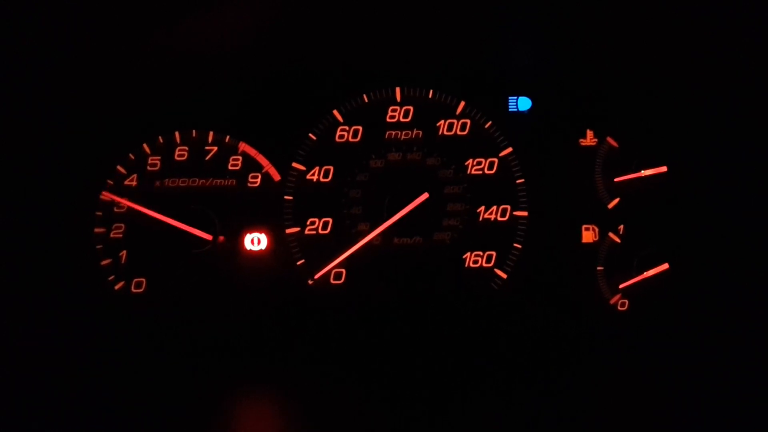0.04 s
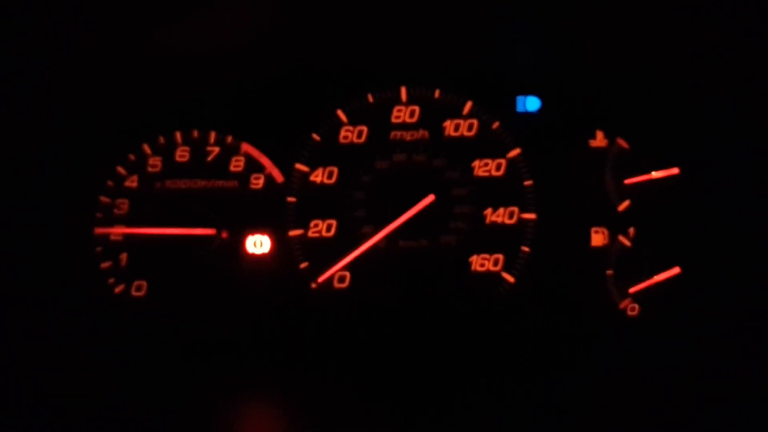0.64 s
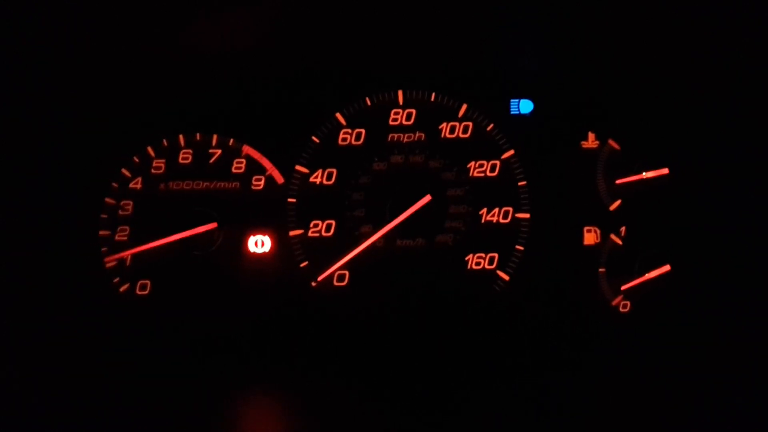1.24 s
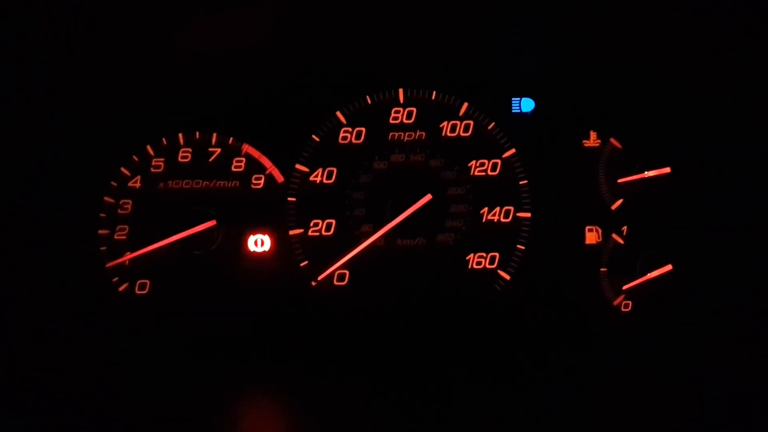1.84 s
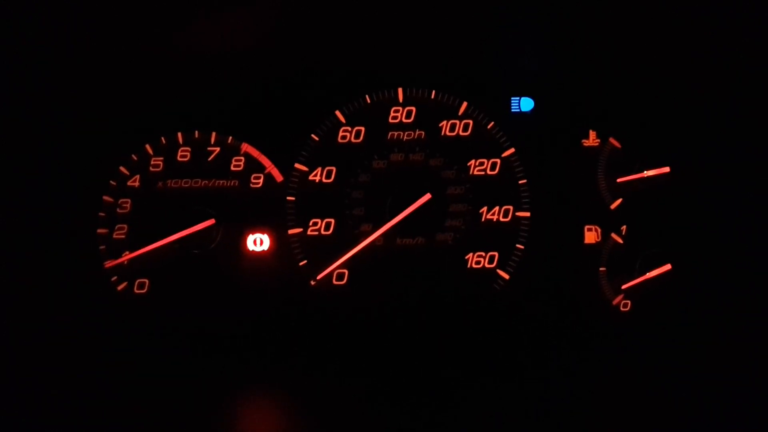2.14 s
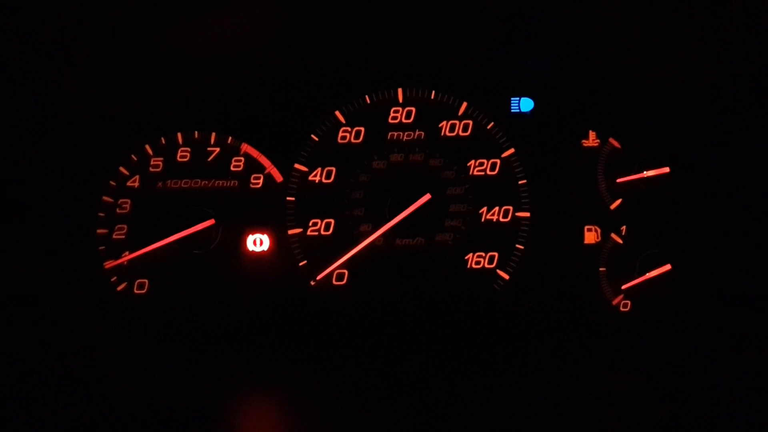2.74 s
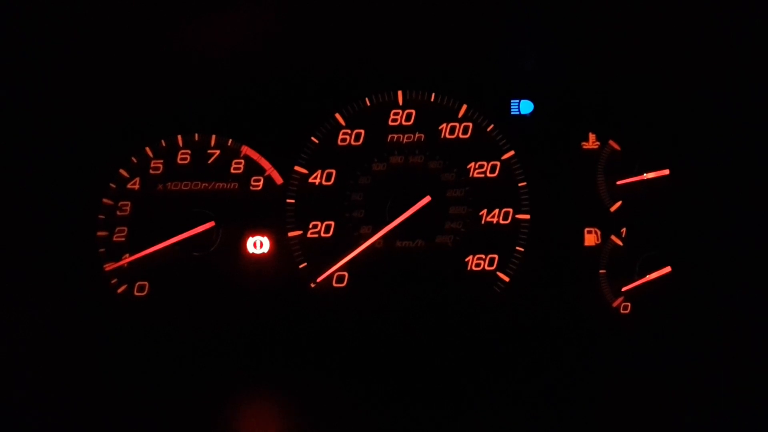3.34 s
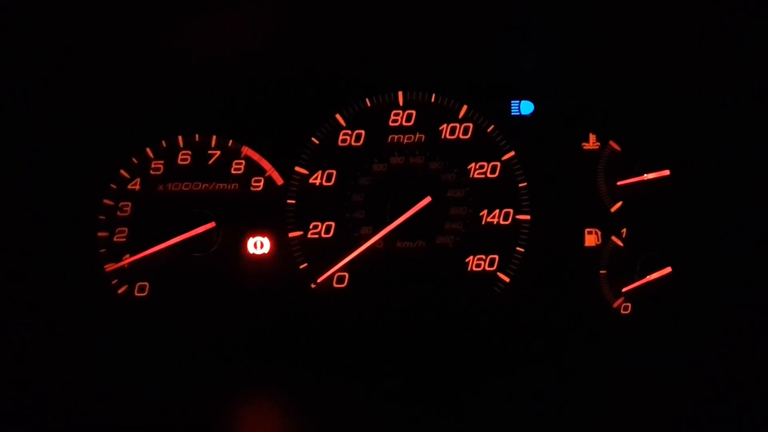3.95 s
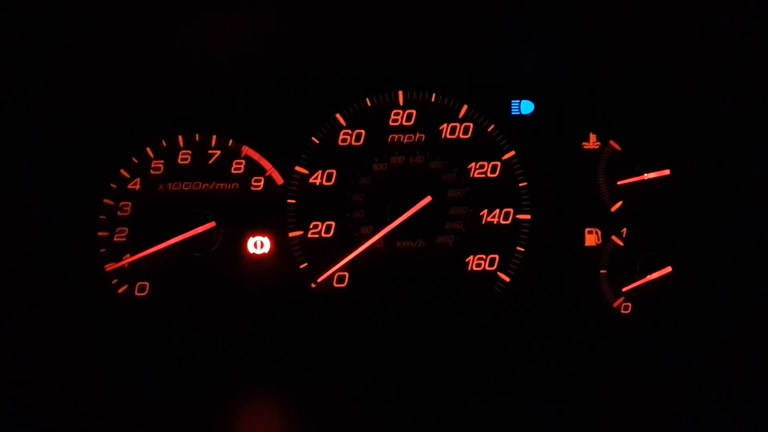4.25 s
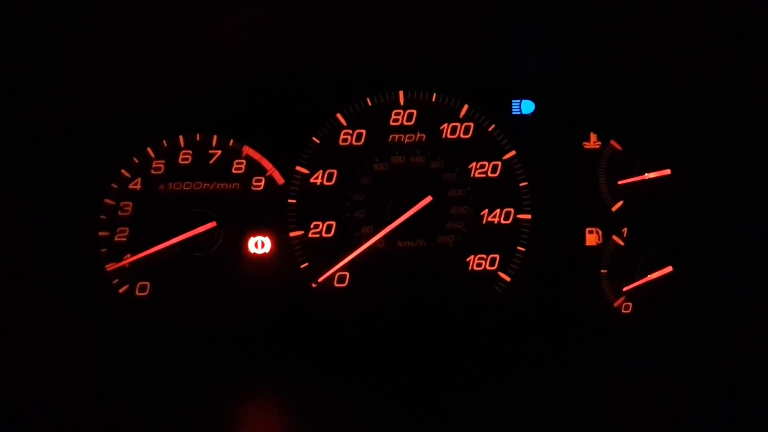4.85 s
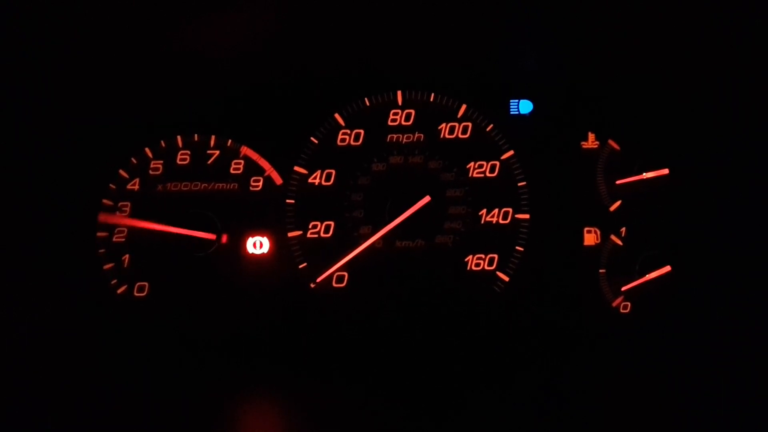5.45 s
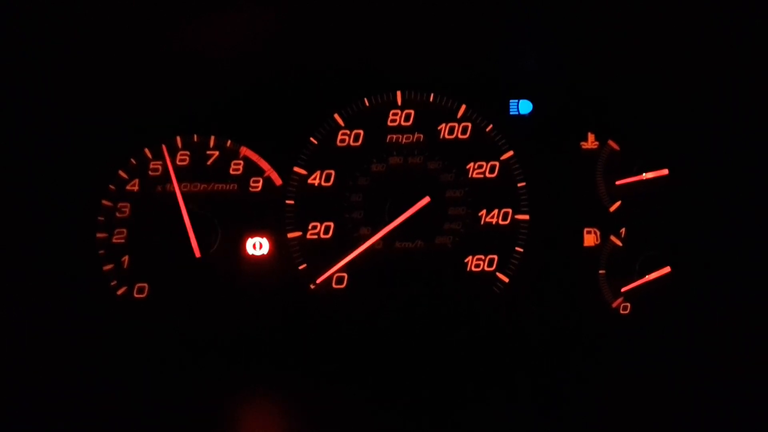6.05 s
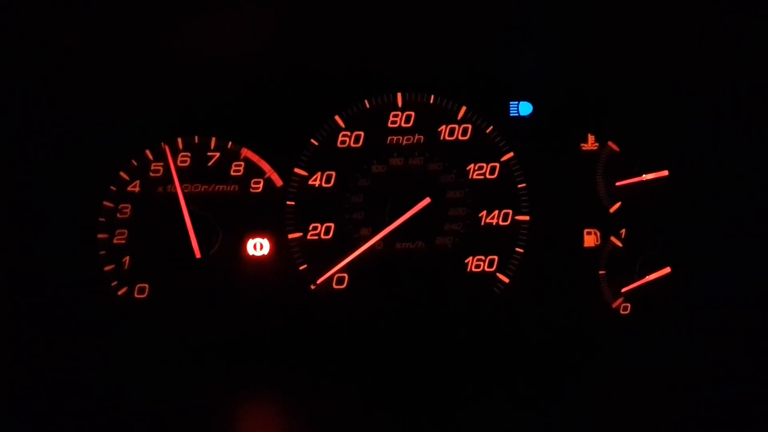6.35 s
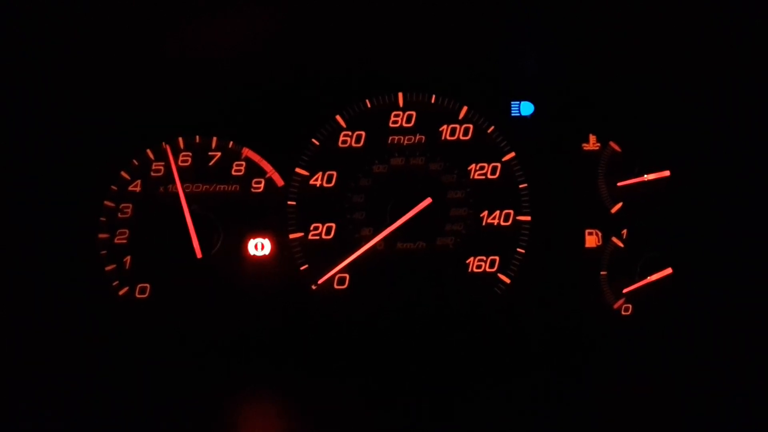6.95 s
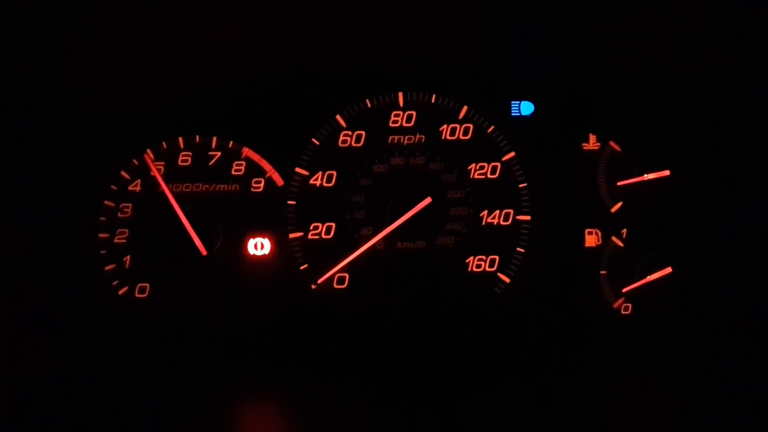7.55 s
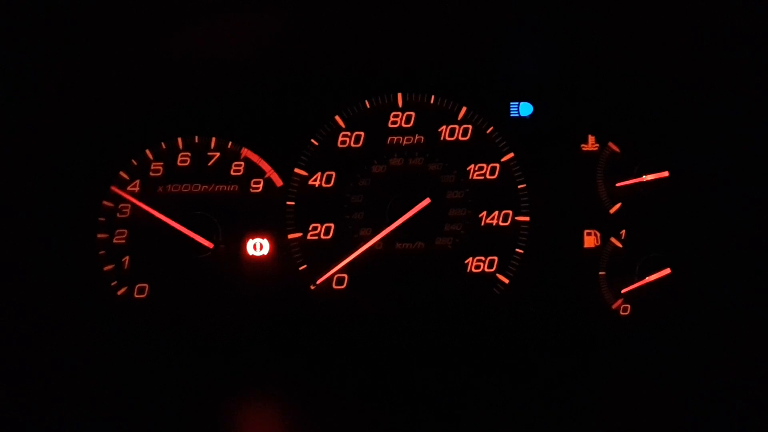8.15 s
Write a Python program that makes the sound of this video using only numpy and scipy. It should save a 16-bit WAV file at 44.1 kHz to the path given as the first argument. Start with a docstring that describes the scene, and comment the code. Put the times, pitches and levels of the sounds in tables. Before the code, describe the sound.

A four-cylinder car engine is heard from the driver's seat, deep and booming in the closed cabin. It starts at raised revs and falls in pitch and loudness, with three dull thuds in the first 0.6 seconds. By about 2 seconds it settles into a quiet, low idle hum with a faint hiss. Soft thumps come around 4.7 seconds, then a light pedal clack slightly to the left at 4.9 and another low thud. From 5.2 seconds the engine revs sharply, swelling into a loud roar with exhaust burble and muffled mechanical clatter. Between about 5.7 and 7.2 seconds it holds a high drone, bouncing softly off the rev limiter six times in an even pulse. Then the throttle is released and the engine winds down, still booming and falling in pitch at the end, around 8.2 seconds.

```python
"""A booming four-cylinder engine sinks to idle, heard from the driver's seat. The pedal clacks,
the engine races up, bounces six times off a soft rev limiter, then winds down.
The firing tone booms in the cabin's standing waves and exhaust tones sweep through its panels;
each firing puffs out roar, and clatter that comes muffled through the bulkhead."""
import sys
import numpy as np
from scipy import signal
from scipy.fft import rfft, irfft, next_fast_len
from scipy.io import wavfile
from scipy.ndimage import uniform_filter1d

SR = 44100
rng = np.random.default_rng(int(sys.argv[2]) if len(sys.argv) > 2 else 0)


def digitize_waveform(pressure):
    """Quantize a signal to 16-bit integers and store it at the path in sys.argv[1].

    Rows of a 2-D input are taken as channels; values are limited to [-1, 1].
    """
    field = np.atleast_2d(pressure).T
    bounded = np.clip(field, -1, 1)
    quanta = np.round(bounded * 32767).astype(np.int16)
    wavfile.write(sys.argv[1], SR, quanta)


N = 362061
TIME = np.arange(N) / SR
FFT_SIZE = next_fast_len(N + SR // 10, True)
BINS_HZ = np.fft.rfftfreq(FFT_SIZE, 1 / SR)


# engine speed: sinking to idle, pedal down, at each fuel cut, pedal up (time [s], firing rate [Hz])
RUN_DOWN = [(0, 102.4), (.1, 100), (.4, 79.83), (.6, 69.13), (.8, 54.15), (1, 43.93), (1.3, 31.3),
            (1.6, 29.6), (2.05, 26.4)]
RUN_UP = [(5.139, 26.4), (5.2, 31.92), (5.3, 47.02), (5.4, 70), (5.5, 108), (5.675, 171.8)]
FUEL_CUTS = [(5.755, 192.6), (6.014, 190.3), (6.284, 193.7), (6.564, 191.6), (6.847, 195.5), (7.127, 189.7)]
WIND_DOWN = [(7.3, 175.4), (7.5, 159.2), (7.8, 136.7), (8.21, 107.7)]

def firing_rate(resume_hz=174.8, surge_s=.066):
    """Engine speed in Hz; after a cut it sags until fuel returns and it surges to the next cut."""
    resumes = [(s - surge_s, resume_hz) for s, _ in FUEL_CUTS[1:]]
    points = sorted(tuple(row) for row in [*RUN_DOWN, *RUN_UP, *FUEL_CUTS, *resumes, *WIND_DOWN])
    return lookup(points, TIME)


# extra shake under full fuel (firing rate [Hz], gain [dB])
BOOM_PULL = [(50, -2.5), (75, 13), (120, 4), (175, -0.5)]
# cabin standing waves (frequency [Hz], width [Hz], gain [dB], polarity at the seat [+/-1])
AIR_MODES = [(50.46, 20.9, -24, 1.0), (53.66, 8.1, -19, -1.0), (65, 5.8, -27.5, -1.0),
             (91.5, 9.4, -22.7, 1.0), (103.1, 6.7, -19, -1.0), (113.9, 15, -13.5, 1.0),
             (123.73, 9.1, -12.5, 1.0), (132.27, 28.1, -6, -1.0), (133.7, 8, -5, 1.0),
             (146, 18.8, -13.5, 1.0), (161.5, 12, -9.5, -1.0), (162.96, 7.1, -5.5, 1.0),
             (173.5, 6.9, -9.5, 1.0), (186.4, 13.3, -6.5, -1.0)]

def boom(cycles, hz, fuel, flutter_db=.67, left_db=.5, lead_cycles=.026):
    """The firing tone sweeps the cabin's standing waves, which swell, ring on and beat against it."""
    idle_db = np.interp(hz, [26, 31], [-14, 0])
    drive_db = fuel * lookup(BOOM_PULL, hz) + idle_db + flutter_db * (1 + fuel) * wander(35)
    drive = amp(drive_db) * np.exp(2j * np.pi * cycles)
    air = np.zeros(N, complex)
    for mode_hz, width_hz, db, polarity in AIR_MODES:
        decay = np.exp(-np.pi * width_hz / SR)
        pole = decay * np.exp(2j * np.pi * mode_hz / SR)
        air += polarity * amp(db) * signal.lfilter([1 - decay], [1, -pole], drive)
    left = air * np.exp(2j * np.pi * lead_cycles)
    return np.sqrt(2) * np.array([left.real, air.real]) * pan(left_db / 2)


# octave through the cabin (frequency [Hz], level [dB])
OCTAVE_COLOUR = [(53, -49), (66, -51.5), (76, -38.5), (93, -36), (112, -40.5), (135, -39.5), (155, -44),
                 (175, -41.5), (190, -34.5), (205, -48), (220, -37), (245, -45), (350, -40.5), (385, -33)]
# change under full fuel (firing rate [Hz], gain [dB])
OCTAVE_PULL = [(58, 12), (80, -2), (105, 12), (138, -8), (164, 13.5), (178, -2)]

def octave(cycles, hz, fuel, left_db=2, lead_cycles=.021):
    """The firing tone's octave, stronger under fuel at most speeds."""
    level_db = log_lookup(OCTAVE_COLOUR, 2 * hz) + fuel * lookup(OCTAVE_PULL, hz) + .5 * wander(7)
    stereo_cycles = cycles + np.array([[lead_cycles], [0]])
    return tone(2 * stereo_cycles, level_db) * pan(left_db / 2)


def drone(cycles, hz, labour, modes_db=-38, labour_db=-38, panel_db=-34.5):
    """The third order rings two air modes and a panel on the left, and grows as the engine labours."""
    modes = sum(resonance(3 * hz, mode_hz, width_hz=30) for mode_hz in (120, 192))
    air = np.interp(hz, [28, 38], [0, 1]) * modes * amp(modes_db)
    panel = amp(panel_db) * resonance(3 * hz, 553, width_hz=45) * pan(3)
    return (air + labour * amp(labour_db) + panel) * tone(3 * cycles, 2 * wander(20))


# prominent exhaust tones (order [x firing rate], gain [dB])
STRONG_ORDERS = [(.75, 6.5), (1.5, -0.5), (3.5, 0), (3.75, 3.5), (4, 5), (4.5, 0), (5, 8), (5.75, 7),
                 (6, 2.5), (8, -0.5), (10.25, 4)]
# exhaust path into the cabin (frequency [Hz], gain [dB])
EXHAUST_COLOUR = [(20, -14.5), (60, -3), (110, 6), (230, 1), (330, -4.5), (450, -6), (620, 1), (780, -6.5),
                  (1100, -15), (1500, -24), (2200, -21.5)]

def exhaust(cycles, hz, waver=.38, half_order_db=2, gain_db=3):
    """Unequal cylinders give tones at quarters of the firing rate, which sweep through the panels."""
    strong_db = {round(4 * order): db for order, db in STRONG_ORDERS}
    lines = np.zeros(N, complex)
    for quarter in range(1, 36):
        if quarter not in (4, 8):  # played by boom and octave
            db = strong_db.get(quarter, 0) + half_order_db * (quarter % 2 == 0)
            size = amp(db) * (1 + waver * wander(18))
            lines += size * np.exp(2j * np.pi * (quarter * cycles / 4 + rng.random()))
    running = np.interp(hz, [28, 42], [.1, 1])
    return spread(np.array([lines.real, lines.imag]), cabin(EXHAUST_COLOUR)) * running * amp(gain_db)


# coasting tones (order [x firing rate], level re roar [dB])
COAST_ORDERS = [(1.5, -11), (2.5, -16), (3, -8.5), (3.75, -14), (4, -13)]

def overrun(cycles, coasting, roar_db):
    """With the fuel off, a few orders sing out as they fall."""
    lines = sum(tone(order * cycles + .031 * wander(20), roar_db + db + 3 * wander(7))
                for order, db in COAST_ORDERS)
    return coasting * lines * pan(-.5)


# noise spectra in the cabin (frequency [Hz], relative density [dB])
ROAR_COLOUR = [(20, -11), (60, 3), (110, 2.5), (230, 3.5), (300, -3.5), (450, -7), (620, -5), (780, -6.5),
               (1100, -13), (1400, -17.5), (2200, -50)]
CLATTER_COLOUR = [(500, -31), (1000, -10), (1400, 2.5), (1900, -2.5), (2400, 1.5), (2900, -2), (3800, -9.5),
                  (4900, -16.5), (6000, -24.5), (9000, -41)]
FIZZ_COLOUR = [(3500, -17), (5800, -10), (6600, -6), (7000, 0), (7400, -4.5), (8000, 0), (9400, -1.5),
               (10300, -0.5), (11500, -3), (13300, -7.5), (15500, -15.5)]

def firing_noise(cycles, hz, labour, roar_db, clatter_db, trim_hz=170.5, trim_width_hz=8.3, trim_db=-56):
    """Each firing puffs roar, clatter and fizz; loose trim fizzes as the rate passes its resonance."""
    depth = .089 + .29 * labour  # puffs stand apart under load at low revs
    beat = depth * np.cos(2 * np.pi * cycles) + .021 * np.cos(np.pi * cycles / 2)
    puffs = evened(np.exp(beat + .096 * wander(54)))
    roar = spread(white() * puffs, cabin(ROAR_COLOUR)) * amp(roar_db + 1)
    clatter = spread(white() * puffs, cabin(CLATTER_COLOUR)) * amp(clatter_db - .02)
    trim = amp(trim_db) / np.hypot(1, 2 * (hz - trim_hz) / trim_width_hz)
    fizz = spread(white() * puffs, cabin(FIZZ_COLOUR)) * (trim + amp(clatter_db - 13))
    return roar + clatter + fizz


# exhaust shake (frequency [Hz], relative density [dB])
BURBLE_COLOUR = [(18, -15), (35, -12), (60, -3.5), (100, -3.5), (140, 1), (230, -11), (400, -13),
                 (900, -24), (2000, -56.5)]

def burble(fuel, hz, full_db=-27):
    """Uneven burning shakes the exhaust when the engine pulls, most of all on the limiter."""
    strength = fuel * np.interp(hz, [30, 160, 180], [.25, .5, 1])
    return spread(white(), amp(log_lookup(BURBLE_COLOUR, BINS_HZ))) * strength * amp(full_db)


# idle tones (order [x firing rate], level [dB])
IDLE_ORDERS = [(4, -54), (6, -74), (7, -50.5), (9, -92)]

def idle_hum(cycles, hz, build_s=.37):
    """At idle, a low hum builds up in the cabin air."""
    idling = np.interp(hz, [26.6, 28.6], [1, 0])
    decay = np.exp(-1 / (build_s * SR))
    settled = idling * signal.lfilter([1 - decay], [1, -decay], idling)
    hum = sum(tone(order * cycles + rng.random(), db + .5 * wander(3.2)) for order, db in IDLE_ORDERS)
    return settled * hum


# exhaust and footwell thuds (time [s], level [dB], pitch [Hz], t60 [s])
THUDS = [(0.251, -20, 380, 0.016), (0.368, -21, 128, 0.073), (0.583, -21, 103, 0.098),
         (4.721, -22, 120.2, 0.065), (4.761, -23.5, 104.4, 0.04), (5.051, -29, 61.5, 0.25),
         (5.18, -19, 59.5, 0.22)]
# pedal clacks (time [s], level [dB])
CLACKS = [(4.905, -53), (4.933, -34.5), (4.948, -35), (5.149, -45)]
# pedal ring (frequency [Hz], relative level [dB], t60 [s])
PEDAL_MODES = [(375, 11, 0.067), (442.5, 5, 0.059), (594, 8.5, 0.04), (686.5, -6, 0.098), (830, 4.5, 0.048),
               (990, -7, 0.066)]

def knocks(attack_s=.0027, scuff_s=.0018):
    """Dull thuds, and the pedal ringing in the footwell on the left."""
    thuds, clacks = np.zeros((2, N))
    t = np.arange(SR // 3) / SR
    onset = 1 - np.exp(-t / attack_s)
    for start_s, db, hz, t60 in THUDS:
        add(thuds, start_s, onset * amp(db - 60 * t / t60) * np.sin(2 * np.pi * hz * t))
    for start_s, db in CLACKS:
        ring = sum(amp(mode_db - 60 * t / t60) * np.sin(2 * np.pi * (hz * t + rng.random()))
                   for hz, mode_db, t60 in PEDAL_MODES)
        scuff = .21 * rng.standard_normal(len(t)) * np.exp(-t / scuff_s)
        clack = onset * (ring + scuff)
        add(clacks, start_s, amp(db) * clack / abs(clack).max())
    return thuds + clacks * pan(3)


# speeds of belt-driven parts (order [x firing rate])
BELT_ORDERS = [8, 10.2]

def belt(cycles, hz, panel_hz=1450, width_hz=170, level_db=-57):
    """The belt drive whirrs as it sweeps through one panel's resonance."""
    whirr = np.zeros((2, N))
    for order in BELT_ORDERS:
        ring = resonance(order * hz, panel_hz, width_hz)
        for channel in whirr:
            channel += ring * tone(order * cycles + .11 * wander(30), level_db + 2 * wander(20))
    return whirr


def fan(pitch_hz=127.2, level_db=-55):
    """A fan's wavering hum."""
    return tone(pitch_hz * TIME + .13 * wander(5), level_db + 3 * wander(21))


# thin squeak (time [s], length [s], pitch [Hz], width [Hz])
SQUEAK = (7.076, .036, 15100, 220)

def squeak(left_db=-42, right_db=-37):
    """One brief, unsteady chirp at the top of hearing."""
    start_s, length_s, pitch_hz, width_hz = SQUEAK
    swell = np.sin(np.pi * np.clip((TIME - start_s) / length_s, 0, 1))
    return swell * np.array([tone(np.cumsum(pitch_hz + width_hz / 2 * wander(200)) / SR, db)
                             for db in (left_db, right_db)])


def whine(hz, pitch_hz=15625, base_db=-70):
    """A faint, very high whine that shows at low revs."""
    level_db = base_db + np.interp(hz, [27, 40, 70, 100], [-14, 1, 7, -16])
    return tone(pitch_hz * TIME + .15 * wander(25), level_db)


# noise floor (frequency [Hz], relative density [dB])
HISS_COLOUR = [(100, 5), (1000, 5.5), (2500, 2), (4000, -0.5), (6000, -6.5), (8000, -8), (10000, -0.5),
               (13000, 2.5), (15600, 1.5)]

def hiss(level_db=-61):
    """Faint, steady hiss."""
    return spread(white(), amp(log_lookup(HISS_COLOUR, BINS_HZ))) * amp(level_db)


# air and panel resonances (frequency [Hz], width [Hz], lift [dB])
PANELS = [(113, 19, 6.5), (180.3, 17, 12), (406, 140, 5.5), (542.5, 22, 11), (664.6, 21, 9.5), (840, 13, 1),
          (1090.5, 32, 10), (1475, 7.4, 10), (1872, 39, 8), (2360, 11, 5.5), (8750, 40, 11), (9940, 33, 5)]

def cabin(colour):
    """Gain per bin: a broad colour with the cabin's resonances on top."""
    lift_db = sum(db * resonance(BINS_HZ, hz, width_hz) for hz, width_hz, db in PANELS)
    return amp(log_lookup(colour, BINS_HZ) + lift_db)


# left-right likeness (frequency [Hz], coherence [0..1])
COHERENCE = [(100, 0.99), (250, 0.76), (550, 0.7), (1100, .2), (2200, 0.25), (5000, 0.074), (12000, 0.12)]
# balance (frequency [Hz], left minus right [dB])
BALANCE = [(100, -0.5), (300, 1.5), (550, 2), (1000, 2.5), (2000, 1), (4000, 0.5), (8000, 2), (12000, -3)]

def spread(pair, gain, right_delay_s=.00039):
    """Colours two unrelated signals into a unit-level field: bass alike, treble diffuse, left first."""
    a, b = rfft(pair, FFT_SIZE)
    coherence = log_lookup(COHERENCE, BINS_HZ)
    mid, side = a * np.sqrt(1 + coherence), b * np.sqrt(1 - coherence)
    lean = amp(log_lookup(BALANCE, BINS_HZ) / 2)
    delay_s = right_delay_s * np.interp(BINS_HZ, [600, 1500], [0, 1])
    left = (mid + side) * lean
    right = (mid - side) * np.exp(-2j * np.pi * BINS_HZ * delay_s) / lean
    field = irfft(np.array([left, right]) * gain, FFT_SIZE)[:, :N]
    return field / np.std(field.mean(0))


def wander(rate_hz, hop=64):
    """Smooth random drift, about unit RMS."""
    coarse = rng.standard_normal(N // hop + 2)
    hz = np.fft.rfftfreq(len(coarse), hop / SR)
    slow = irfft(rfft(coarse) / (1 + (hz / rate_hz) ** 4), len(coarse))
    return np.interp(np.arange(N) / hop, np.arange(len(coarse)), evened(slow))


def lookup(rows, x, column=1):
    columns = np.transpose(rows)
    return np.interp(x, columns[0], columns[column])


def log_lookup(rows, hz):
    points_hz, values = np.transpose(rows)
    return np.interp(np.log(hz + 1), np.log(points_hz + 1), values)


def resonance(hz, centre_hz, width_hz):
    return 1 / (1 + (2 * (hz - centre_hz) / width_hz) ** 2)


def tone(cycles, rms_db):
    return np.sqrt(2) * amp(rms_db) * np.sin(2 * np.pi * cycles)


def white():
    return rng.standard_normal((2, N))


def amp(db):
    return 10 ** (np.asarray(db) / 20)


def pan(db):
    return amp([[db], [-db]])


def evened(x):
    return x / np.sqrt(np.mean(x ** 2) + 1e-20)


def add(mix, start_s, sound):
    part = mix[max(round(start_s * SR), 0):][:len(sound)]
    part += sound[:len(part)]


# base levels (firing rate [Hz], combustion roar [dB], valve and chain clatter [dB], full-fuel lift [dB])
LOUDNESS = [(26.4, -57, -76.5, 42), (29.8, -56, -72, 9), (42, -51, -68.5, 7.5), (68, -48, -63.5, 3.5),
            (100, -43, -58, 3), (136.7, -37.5, -51, 1), (170, -34, -47.5, 0), (185, -31.5, -47.5, 1.5)]

def scene(full_fuel_hz_per_s=230):
    """Speed sets the engine's pitches and levels; rising speed means fuel, falling speed coasting."""
    hz = firing_rate()
    cycles = np.cumsum(hz) / SR
    climb_hz_per_s = np.gradient(hz) * SR
    fuel = uniform_filter1d(np.clip(climb_hz_per_s / full_fuel_hz_per_s, 0, 1), size=1200)
    labour = fuel * np.interp(hz, [60, 150], [1, 0])
    falling = uniform_filter1d(1. * (climb_hz_per_s < 0), size=1200)
    coasting = falling * np.interp(hz, [50, 110, 155, 180], [0, 1, 1, .45])
    lift_db = fuel * lookup(LOUDNESS, hz, column=3)
    roar_db = lookup(LOUDNESS, hz) + lift_db
    clatter_db = lookup(LOUDNESS, hz, column=2) + lift_db
    mix = boom(cycles, hz, fuel) + octave(cycles, hz, fuel)
    mix += idle_hum(cycles, hz) + fan() + drone(cycles, hz, labour)
    mix += exhaust(cycles, hz) * amp(roar_db - 3 * coasting)
    mix += overrun(cycles, coasting, roar_db) + belt(cycles, hz)
    mix += firing_noise(cycles, hz, labour, roar_db - .3 * coasting, clatter_db) + burble(fuel, hz)
    return mix + hiss() + knocks() + squeak() + whine(hz)


def record(dry, ceiling_db=-7, cutoff_hz=15780):
    """A level limiter holds the boom at its ceiling; then soft ends and a steep low-pass."""
    power_db = 10 * np.log10(abs(uniform_filter1d((dry ** 2).mean(0), size=720)) + 1e-12)
    reduction_db = uniform_filter1d(np.maximum(power_db - ceiling_db, 0), size=400)
    faded = dry / amp(reduction_db) * signal.windows.tukey(N, .001)
    lowpass = signal.firwin(1023, cutoff_hz, window=("kaiser", 9), fs=SR)
    return signal.oaconvolve(faded, lowpass[None], "same")


dry = scene()
out = record(dry)
digitize_waveform(out)
```